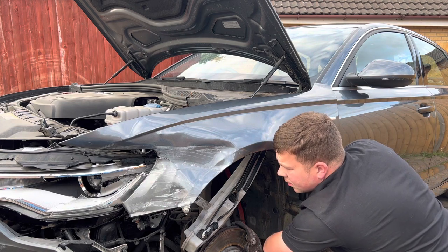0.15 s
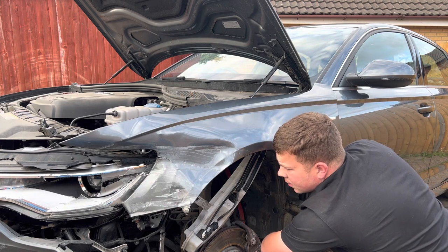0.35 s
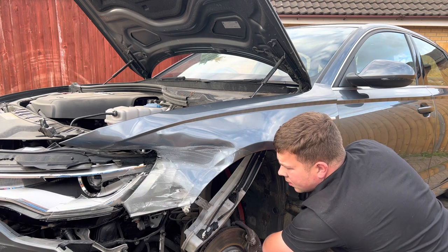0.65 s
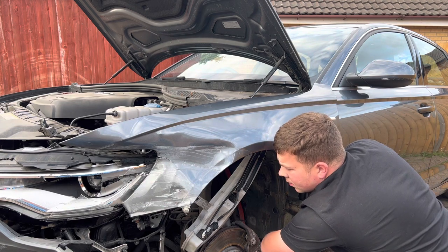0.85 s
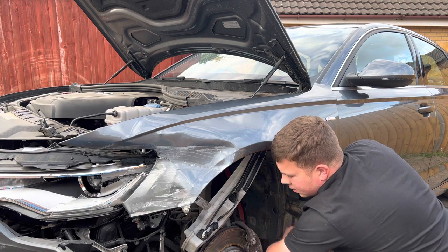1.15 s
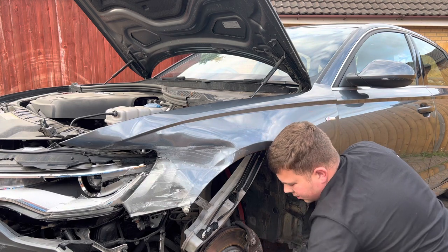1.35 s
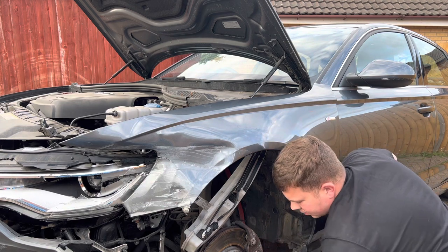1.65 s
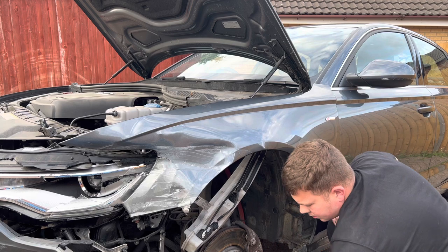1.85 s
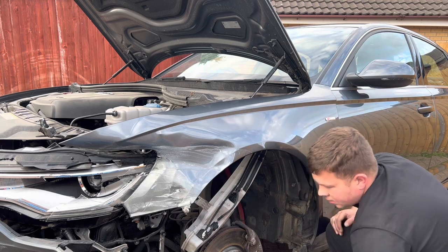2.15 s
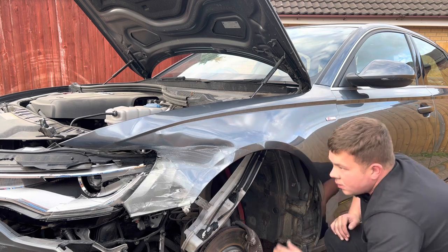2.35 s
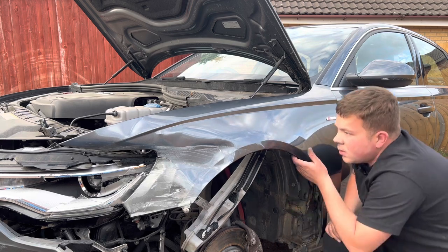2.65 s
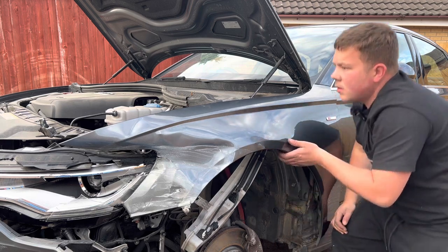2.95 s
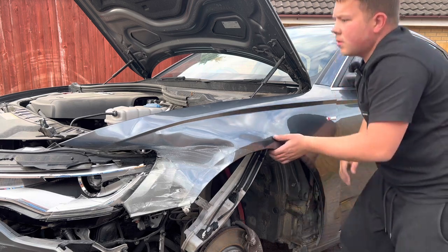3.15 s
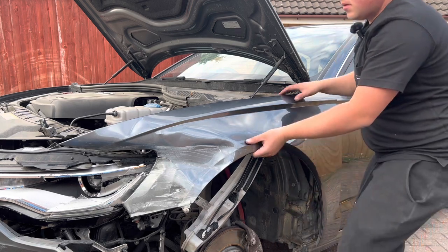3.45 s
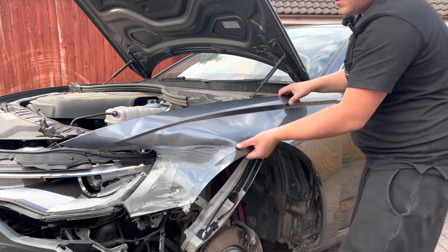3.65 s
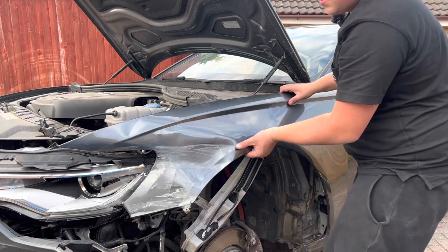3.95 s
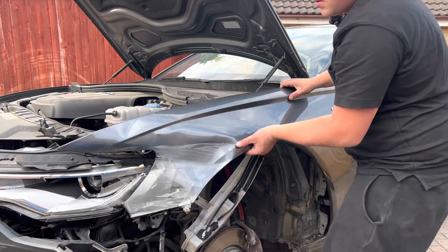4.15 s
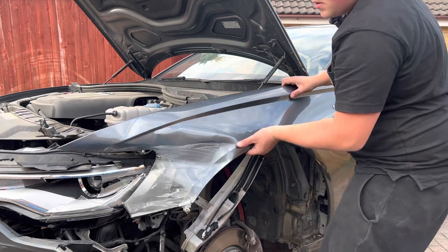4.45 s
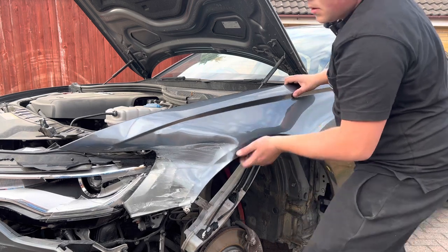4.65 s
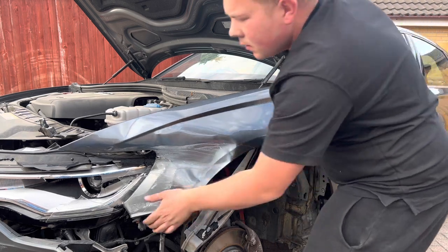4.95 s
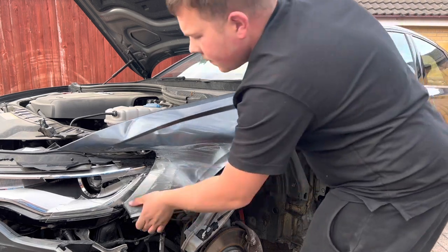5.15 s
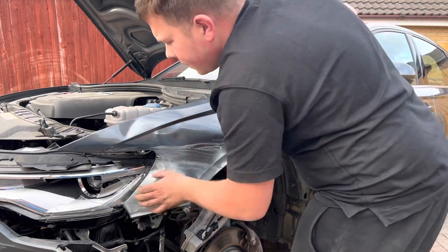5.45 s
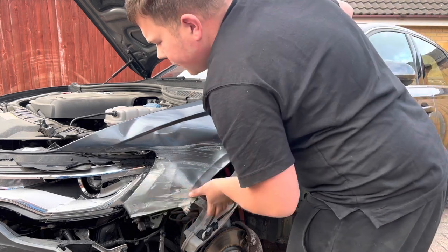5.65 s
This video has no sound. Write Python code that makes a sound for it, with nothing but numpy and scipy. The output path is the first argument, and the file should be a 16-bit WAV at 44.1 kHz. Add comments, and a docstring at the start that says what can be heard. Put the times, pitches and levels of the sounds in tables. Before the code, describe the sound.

A hand tool clatters down, then a thin metal car panel groans, scrapes and pops loose with a few hard cracks, outdoors, very close.

```python
"""On a driveway, a steel front wing is worked loose from a car, close to a microphone clipped to a shirt.
A hand tool clatters down: each blow rings its modes and grinds. The sheet groans by stick-slip friction as it
flexes, sings on a main mode as it slides, pops off its seats with a few hard cracks and knocks more dully.
Grit and trim tick as snaps of bright noise, shirt cloth hisses as its fibres slip, and steady outdoor noise
lies beneath. The microphone saturates on the loudest cracks."""
import sys
import numpy as np
from scipy import signal
from scipy.fft import rfft, irfft
from scipy.io import wavfile

SR = 44100
rng = np.random.default_rng(int(sys.argv[2]) if len(sys.argv) > 2 else 0)


def waveform_to_disk(signal):
    """Save audio, clipped to [-1, 1], as 16-bit WAV at the path in sys.argv[1]."""
    frames = np.transpose(np.atleast_2d(signal))
    scaled = np.clip(frames, -1, 1) * 32767
    samples = np.round(scaled).astype(np.int16)
    wavfile.write(sys.argv[1], SR, samples)


N = 255769
TIME = np.arange(N) / SR

# Modes of the steel wing. Each row: frequency in Hz, relative level in dB, decay time (t60) in seconds.
WING_MODES = [(126, -8, .25), (303, -2, .25), (375, -1, .24), (460, 1, .3), (575, -5, .14), (818, -3, .17),
              (881, 0, .19), (1162, -3, .15), (1240, -3, .17), (1376, -3, .22), (1511, -2, .24),
              (1644, 1, .19), (1980, 0, .15), (2215, 0, .14), (2536, -3, .11), (2640, -2, .1),
              (2713, -1, .11), (2966, -2, .11), (3132, 2, .13), (3510, -2, .09), (4026, 1, .1),
              (4222, 0, .1), (4553, 1, .1), (4842, 3, .1), (5400, -1, .07), (6200, 1, .07), (6590, 2, .07),
              (7396, 2, .06)]


def from_db(db):
    """Amplitude ratio: 20 dB is a factor of ten."""
    return 10 ** (np.asarray(db) / 20)


def rms_one(x):
    """Normalisation by signal power: scale to unit rms."""
    return x / np.sqrt(np.mean(x ** 2) + 1e-20)


def at_hz(points, hz):
    """Linear interpolation of a table on a log-frequency axis."""
    table_hz, values = np.array(points).T
    return np.interp(np.log(hz), np.log(table_hz), values)


def band(x, low_hz, high_hz, order=2):
    """Causal Butterworth band-pass."""
    edges = [low_hz, min(high_hz, 0.45 * SR)]
    sos = signal.butter(order, edges, "band", fs=SR, output="sos")
    return signal.sosfilt(sos, x + 1e-18)


def drift(rate):
    """Random modulation: straight lines between Gaussian values drawn `rate` times a second."""
    count = int(6 * rate) + 2
    return np.interp(TIME * rate, np.arange(count), rng.standard_normal(count))


def coloured(x, spectrum):
    """Spectral shaping: weight a steady noise by a spectrum in the frequency domain; unit rms."""
    hz = np.maximum(np.fft.rfftfreq(len(x), 1 / SR), 1)
    shaped = rfft(x) * from_db(at_hz(spectrum, hz))
    return rms_one(irfft(shaped, len(x)))


def stroke(start_s, rise_s, length_s, release_t60):
    """Envelope of one movement: linear build-up, hold to the end of its length, exponential decay."""
    out, at = np.zeros(N), int(max(start_s, 0) * SR)
    t = TIME[:N - at][:int((length_s + 1.5 * release_t60) * SR)]
    rise = np.minimum(t / rise_s, 1)
    out[at:at + len(t)] = rise * from_db(-60 * np.maximum(t - length_s, 0) / release_t60)
    return out


def slips(per_s, spread_db):
    """Stick-slip friction: tiny clicks at random moments, of random sign and uneven size."""
    sizes_db = spread_db * np.minimum(rng.exponential(1, N), 4)
    clicks = from_db(sizes_db) * rng.choice([-1, 1], N)
    return rms_one(clicks * (rng.random(N) < per_s / SR))


def response(modes, modes_db, wash_db):
    """Impulse response of a body to one slip: the slip itself, its main modes and a diffuse wash."""
    # Decay of the wash of countless small modes. Each row: frequency in Hz, decay time (t60) in seconds.
    wash_decay = [(80, 0.64), (200, 0.043), (450, 0.13), (1000, 0.22), (2500, 0.2), (5000, 0.033),
                  (9000, 0.032), (15000, .12)]
    t = TIME[:SR // 2]
    out = np.zeros(len(t))
    for hz, db, t60 in modes:
        # strength falls with decay time, so a long ring does not carry a larger spectral peak
        strength = from_db(modes_db + db) * 2 * np.log(1000) / (t60 * SR)
        out += strength * np.cos(2 * np.pi * hz * t) * from_db(-60 * t / t60)
    edges = np.geomspace(50, 16000, 12)
    for low, high in zip(edges, edges[1:]):
        t60 = at_hz(wash_decay, np.sqrt(low * high))
        wash = band(rng.standard_normal(len(t)), low, high) * from_db(-60 * t / t60)
        out += from_db(wash_db) * wash * np.sqrt(2 * np.log(1000) / (t60 * SR))
    out[0] += 1
    return out


def ringing(modes, t, spread_db):
    """Free modal vibration after a blow, each mode with a random strength and sign as the struck spot varies."""
    out = np.zeros(len(t))
    for hz, db, t60 in modes:
        level_db = db + rng.normal(0, spread_db) - 60 * t / t60
        out += rng.choice([-1, 1]) * from_db(level_db) * np.sin(2 * np.pi * hz * t)
    return out


def register_db(hz, balance, hardness_db, spot_hz, upper_hz, lift_db):
    """Contact hardness tilts the spectrum of a blow, and the struck spot favours its own two resonances."""
    pivot_hz, hardness_top_hz = 430, 6070  # the tilt grows no further above the top
    lift_width_octaves = 0.89
    distance_octaves = np.log2(hz / np.array([spot_hz, upper_hz]))
    near_spot, near_upper = np.exp(-(distance_octaves / lift_width_octaves) ** 2)
    octaves = np.log2(min(hz, hardness_top_hz) / pivot_hz)
    return at_hz(balance, hz) + hardness_db * octaves + lift_db * (near_spot + near_upper)


def contacts(table, modes, balance, modes_db, ring_db, wash_db, spot_db, spot_q, upper_db, upper_q,
             rise_s, grain_db, linger):
    """Impact with friction: each blow rings the body's modes and a short crunch of slips as the edges grind."""
    # Spectrum of one slip. Each row: frequency in Hz, relative level in dB per Hz.
    slip_spectrum = [(40, -11.5), (130, 0.5), (320, 3.5), (500, 2), (690, 1), (1400, -2), (2000, -10.5),
                     (3000, -8.5), (4600, -7), (8000, -11), (11000, -16.5), (16000, -27.5)]
    # Edges in Hz of the registers thud, boom, clang, bite, crack and tick.
    register_edges = [45, 280, 650, 1800, 3200, 7000, 15500]
    out, t = np.zeros(N + SR), TIME[:SR * 2 // 5]
    friction = np.tile(coloured(slips(12000, grain_db), slip_spectrum), 2)
    body = response(modes, modes_db, wash_db)[:len(t)]
    attack = SR // 25  # levels are set over the first 40 ms
    for s, grind_s, t60, spot_hz, upper_hz, lift_db, strength_db, hardness_db in table:
        at = int(s * SR)
        ring = from_db(ring_db) * ringing(modes, t, spread_db=3.0)
        resonances = (spot_hz, spot_q, spot_db), (upper_hz, upper_q, upper_db)
        for low, high in zip(register_edges, register_edges[1:]):
            # the crunch lingers in the low registers and dies first in the treble
            decay_s = t60 * (register_edges[4] / max(high, register_edges[3])) ** linger
            rise = np.minimum(t / rise_s, 1)
            force = rise * from_db(-60 * np.maximum(t - grind_s, 0) / decay_s)
            crunch = signal.fftconvolve(friction[at:at + len(t)] * force, body)[:len(t)]
            rung = crunch / np.std(crunch[:attack]) + ring
            for hz, q, peak_db in resonances:
                resonator = signal.iirpeak(hz, q, fs=SR)
                rung = rung + from_db(peak_db + lift_db) * signal.lfilter(*resonator, rung)
            part = band(rung, low, high, order=3)
            balance_db = register_db((low + high) / 2, balance, hardness_db, spot_hz, upper_hz, lift_db)
            out[at:at + len(t)] += from_db(strength_db + balance_db) * part / np.std(part[:attack])
    return out[:N]


def open_air():
    """Stationary noise: the outdoor background, random noise with a fixed spectrum."""
    # Each row: frequency in Hz, relative level in dB per Hz.
    air_spectrum = [(15, -30), (25, -8.5), (91, 3), (216, 1), (425, -1), (513, 0), (603, -4), (748, -1),
                    (1680, -12.5), (1980, -14), (3210, -14.5), (3580, -15), (8030, -22.5), (15800, -36)]
    return from_db(-56) * coloured(rng.standard_normal(N), air_spectrum)


def flexing():
    """Stick-slip excitation: pushing hands and edges rub the sheet, whose modes give a groan and a hollow scrape."""
    # Pushes and pulls on the sheet. Each row: start in seconds, length in seconds, groan level in dB,
    # scrape level in dB.
    pushes = [(-0.01, 0.15, -43, -43), (0.167, 0.091, -47, -47.5), (0.298, 0.033, -43.5, -50.5),
              (0.411, 0.49, -43.5, -43.5), (0.96, 0.096, -47, -39.5), (1.1, 0.45, -60, -56.5),
              (1.76, 0.13, -40, -48.5), (1.857, 0.1, -36, -41.5), (2.133, .05, -34.5, -40.5),
              (2.177, .06, -33.5, -34), (2.293, 0.14, -35.5, -41.5), (2.5, 0.27, -51, -50),
              (2.862, 0.14, -46, -41.5), (3.4, 0.42, -56.5, -49.5), (3.782, 0.13, -30, -34),
              (3.847, 0.28, -38, -29.5), (4.098, 0.18, -39, -38), (4.439, 0.2, -49.5, -44),
              (4.62, 0.17, -57.5, -47), (4.86, 0.065, -61, -48.5), (4.961, 0.065, -35.5, -40),
              (5.1, .2, -51, -53.5), (5.601, 0.21, -57.5, -56)]
    rise_s, release_t60_s = 0.038, 0.46
    # resting hands still rub a little
    groan_level, scrape_level = from_db(-64.5), from_db(-59.5)
    for start_s, length_s, groan_db, scrape_db in pushes:
        effort = stroke(start_s, rise_s, length_s, release_t60_s)
        groan_level = np.maximum(groan_level, from_db(groan_db) * effort)
        scrape_level = np.maximum(scrape_level, from_db(scrape_db) * effort)
    sheet = response(WING_MODES, modes_db=-4.5, wash_db=-1.0)
    rubbed = signal.fftconvolve(slips(1500, 1.2), sheet)[:N]
    groan = rms_one(band(rubbed, 105, 400, order=3))
    scrape = rms_one(band(rubbed, 430, 1195, order=3))
    return groan_level * groan + scrape_level * scrape


def shirt(flutter_db=3.55):
    """Fibre friction: with each rub, fibres slip in a fine hiss whose registers flutter each on their own."""
    # Rubs near the microphone. Each row: start in seconds, rise in seconds, length in seconds, level in dB,
    # brightness in dB per octave.
    rubs = [(0.003, 0.026, 0.093, -34.5, 1.8), (0.194, 0.044, 0.14, -48.5, -1.5),
            (0.396, 0.091, 0.24, -42, 0.9), (0.758, 0.045, .15, -51, -2.9), (1.113, 0.054, 0.06, -59, -0.5),
            (1.358, 0.37, .41, -60.5, 1.3), (1.765, 0.058, 0.14, -52.5, -1.5),
            (2.135, 0.114, .215, -48.5, -1.5), (2.47, 0.026, 0.11, -63.5, -0.7),
            (2.599, .008, .17, -45, -3.5), (3.032, 0.092, 0.46, -58, 2), (3.365, 0.033, .3, -54, -0.4),
            (3.755, 0.026, 0.15, -54.5, -.5), (4.222, 0.034, 0.062, -46.5, -2.1),
            (4.583, 0.059, 0.061, -46, -4.5), (4.743, 0.044, .18, -57.5, -7.5),
            (5.054, .06, .3, -56.5, 3.5), (5.358, 0.042, 0.234, -66, 1.5), (5.756, 0.021, .06, -51.5, .2)]
    # Spectrum of the rubbing cloth. Each row: frequency in Hz, relative level in dB per Hz.
    cloth_spectrum = [(900, -26.5), (2000, -9.5), (2700, -9.5), (3600, 0.5), (4700, -0.5), (5800, -1.5),
                      (7500, -5.5), (10000, -13.5), (13000, -19), (16000, -35.5)]
    release_t60_s, rest_db, pivot_hz = 0.25, -78, 5000
    level, tilt_db = np.full(N, from_db(rest_db)), np.zeros(N)
    for start_s, rise_s, length_s, db, bright_db in rubs:
        rub = from_db(db) * stroke(start_s, rise_s, length_s, release_t60_s)
        tilt_db[rub > level] = bright_db
        level = np.maximum(level, rub)
    fibres = coloured(slips(10000, 0.96), cloth_spectrum)
    edges = np.geomspace(1000, 16000, 7)
    hiss = 0
    for k, (low, high) in enumerate(zip(edges, edges[1:])):
        octaves = np.log2(np.sqrt(low * high) / pivot_hz)
        gain = from_db(tilt_db * octaves + flutter_db * drift(150))
        # alternating signs keep neighbours from cancelling at their shared edge
        hiss = hiss + band(fibres, low, high) * (-1) ** k * gain
    return level * rms_one(hiss)


def tool_clatter():
    """Impact of a small hard body: the hand tool lands and bounces, ringing short modes."""
    # Each row: start in seconds, length of the grinding in seconds, decay time (t60) of the crunch in seconds
    # before its scaling by register, lower and upper resonance of the struck spot in Hz, how much they stand
    # out in dB, strength in dB before the register balance, hardness in dB per octave.
    landings = [(0.109, 0.0077, 0.063, 690, 6170, 7.9, -44, 2),
                (0.561, 0.0071, 0.21, 710, 4750, 10.4, -38.5, -7.5),
                (0.603, 0.022, .1, 513, 5140, 5.1, -29.5, -0.2),
                (0.667, 0.017, 0.12, 597, 6600, 8, -45.5, 1),
                (0.736, .01, 0.066, 940, 3030, 9.9, -37.5, 1.57),
                (0.825, 0.0034, 0.092, 510, 3830, 5.8, -30.5, 3.5),
                (0.903, 0.0057, 0.23, 687, 3400, 5, -56, 3),
                (0.952, 0.018, 0.039, 1020, 4600, 7.7, -39, -0.7),
                (0.97, 0.0032, 0.11, 1060, 4600, 4.3, -29.5, 1.65),
                (0.994, 0.0041, 0.097, 503, 4900, 1.7, -37.5, 1)]
    # Modes of the tool. Each row: frequency in Hz, relative level in dB, decay time (t60) in seconds.
    tool_modes = [(497, 0, .15), (1005, -3, .14), (2780, -3, .07), (3325, -1, .08), (3760, -1, .06),
                  (3965, -2, .07), (4360, -2, .07), (4690, -2, .07), (5600, -2, .06), (6410, 0, .06)]
    # Balance of the registers at zero hardness tilt. Each row: frequency in Hz, level in dB.
    tool_balance = [(160, -8), (465, -1), (1200, -3), (2500, -7.5), (5100, -2), (11000, -15)]
    return contacts(landings, tool_modes, tool_balance, modes_db=8.0, ring_db=-29, wash_db=-8.0,
                    spot_db=0.5, spot_q=2.5, upper_db=-5.5, upper_q=6,
                    rise_s=0.001, grain_db=4.0, linger=0.42)


def ticking(snap_t60=0.0058, tail_t60=0.087, tail_db=-12):
    """Two-stage decay: grit and trim tick with a tiny bright snap and a brief scatter off the wheel arch."""
    # Each row: start in seconds, level of the snap in dB.
    ticks = [(0.726, -36), (1.802, -43), (1.839, -38.5), (1.866, -39), (1.895, -34.5), (1.933, -33),
             (2.243, -39), (2.274, -36.5), (2.375, -39), (4.061, -14.5), (5.106, -43), (5.573, -50)]
    # Spectrum of a tick. Each row: frequency in Hz, relative level in dB per Hz.
    tick_spectrum = [(1000, -35), (3500, 0), (5500, -4), (9500, -5.5), (16000, -22.5)]
    level, t = np.zeros(N + SR), TIME[:SR // 5]
    for s, db in ticks:
        at = int(s * SR)
        snap = from_db(db - 60 * t / snap_t60)
        tail = from_db(db + tail_db - 60 * t / tail_t60)
        level[at:at + len(t)] += snap + tail
    return level[:N] * coloured(rng.standard_normal(N), tick_spectrum)


def wing_knocks():
    """Impact of a thin plate: the wing knocks and cracks against its seats, ringing many modes."""
    # Each row: start in seconds, length of the grinding in seconds, decay time (t60) of the crunch in seconds
    # before its scaling by register, two resonances of the struck spot in Hz, how much they stand out in dB,
    # strength in dB before the register balance, hardness in dB per octave.
    knocks = [(1.781, .003, .074, 267, 6450, 7.9, -46.5, -4.5),
              (1.92, 0.02, .054, 292, 3830, 8.6, -47.5, -1), (1.968, 0.008, .08, 420, 1445, 6.5, -42, -6),
              (2.183, 0.021, .09, 308, 1500, 3.3, -29.5, -6),
              (2.317, 0.0066, .11, 398, 3780, 8.4, -40, -1.2),
              (2.353, 0.0055, .2, 306, 3370, 11.4, -38, -7.5),
              (2.413, 0.0015, 0.064, 1116, 4600, 10.5, -18.5, -1.6),
              (2.422, 0.023, 0.17, 328, 1227, 11.2, -24.5, -2),
              (2.765, 0.0062, .087, 1040, 420, 10, -33, 1.2),
              (2.806, 0.0038, 0.23, 1090, 421, 11.4, -46, -1),
              (2.884, 0.0095, .14, 1040, 1490, 7.6, -48.5, 0.1),
              (2.935, 0.036, .08, 1030, 418, 14.4, -46.5, -3),
              (2.972, 0.0087, .07, 440, 1034, 9.1, -57, -3),
              (3.034, 0.003, .04, 428, 1313, 11, -57.5, -2.5), (3.589, 0.0038, .067, 433, 1320, 7, -49, -1),
              (3.65, 0.0057, .1, 344, 1325, 8.4, -51.5, -1.3), (3.76, 0.0091, .08, 795, 1570, 9.5, -27, -4),
              (3.864, 0.0062, .13, 370, 1530, 3.7, -18, -0.64), (3.922, 0.014, .03, 875, 1484, 6, -13.5, 2),
              (3.981, 0.044, .25, 430, 1670, 3.7, -37.5, 0), (4.064, .013, .025, 636, 2760, 11.2, -20.5, 2),
              (4.112, 0.018, .27, 586, 2650, 8.1, -37.5, -0.5),
              (4.161, 0.0046, 0.1, 457, 3180, 2.4, -46, 4.5), (4.203, 0.0061, .036, 444, 8070, 3, -24, 2),
              (4.226, 0.01, 0.06, 458, 3240, 4, -28, -2.5),
              (4.401, 0.0059, .066, 596, 2534, 11.6, -52.5, -6),
              (4.43, 0.022, .19, 988, 2900, 9.5, -43, -5), (4.492, 0.0066, 0.059, 608, 1020, 12, -34, -4.5),
              (4.548, .005, .045, 275, 1890, 8.5, -43, -5), (4.679, .005, .075, 924, 1074, 11, -46, -4.5),
              (4.966, 0.0072, .057, 615, 2310, 5.7, -33.5, -5.5),
              (5.076, .004, .05, 463, 4430, 7.3, -45.5, -3.5),
              (5.297, .007, .043, 484, 6220, 12, -57, -6.5)]
    # Balance of the registers at zero hardness tilt. Each row: frequency in Hz, level in dB.
    wing_balance = [(160, -9.5), (465, -0.5), (1200, -4), (2500, -4), (5100, -2), (11000, -10)]
    return contacts(knocks, WING_MODES, wing_balance, modes_db=-4.0, ring_db=-19.5, wash_db=-7.5,
                    spot_db=3.5, spot_q=7.3, upper_db=-1.5, upper_q=13,
                    rise_s=0.00043, grain_db=3.5, linger=0.43)


def singing(waver=0.02, flutter_db=4.5):
    """Friction-sustained oscillation: sliding on its seats keeps a mode sounding, unsteady in pitch and strength."""
    # Each row: start in seconds, length in seconds, mean frequency in Hz, level in dB before the flutter.
    slides = [(2.428, 0.073, 422, -29), (2.526, 0.25, 420, -45), (2.776, 0.062, 415, -34.5),
              (2.9, 0.036, 423, -33), (3.777, 0.054, 457, -34.5), (3.823, 0.04, 456, -19.5),
              (3.938, 0.085, 455, -19.5), (4.086, 0.12, 461, -34), (4.27, 0.17, 462, -43)]
    rise_s, release_t60_s = 0.026, 0.12
    level, pitch = np.zeros(N), np.zeros(N)
    for start_s, length_s, hz, db in slides:
        level = np.maximum(level, from_db(db) * stroke(start_s, rise_s, length_s, release_t60_s))
        pitch[int(start_s * SR):] = hz
    phase = 2 * np.pi * np.cumsum(pitch * (1 + waver * drift(60))) / SR
    return level * from_db(flutter_db * drift(70)) * np.sqrt(2) * np.sin(phase)


def scene():
    """Superposition: the pressures of air, sheet, shirt, tool and ticks add at the microphone."""
    background = open_air() + flexing() + shirt()
    blows = tool_clatter() + ticking() + wing_knocks()
    return (background + blows + singing())[None]


def record(dry):
    """Asymmetric saturation: the microphone overloads near full scale, which adds a thump; the top is cut."""
    bias = 0.12  # share of full scale by which the positive side clips earlier
    biased = dry + bias
    clipped = biased / (1 + biased ** 8) ** (1 / 8) - bias
    low_pass = signal.ellip(10, 0.1, 70, 15900, fs=SR, output="sos")  # cutoff in Hz
    return signal.sosfilt(low_pass, clipped)


dry = scene()
out = record(dry)
waveform_to_disk(out)
```